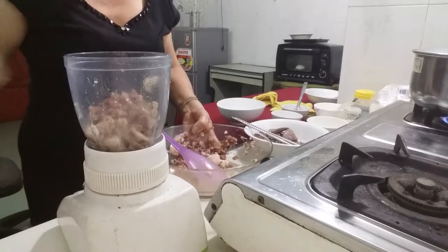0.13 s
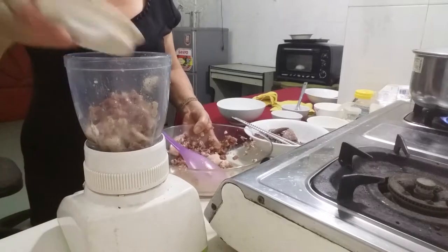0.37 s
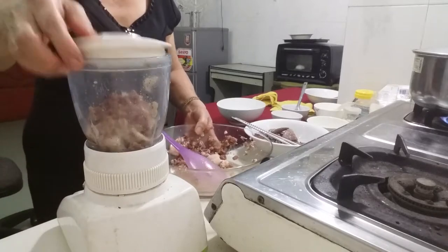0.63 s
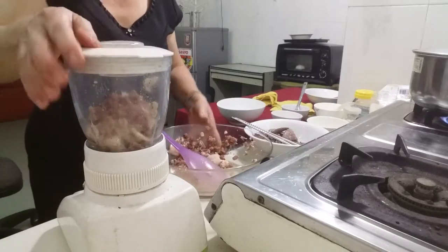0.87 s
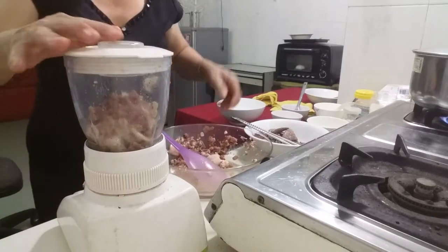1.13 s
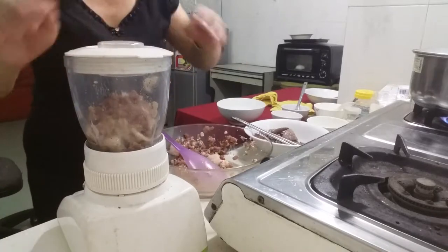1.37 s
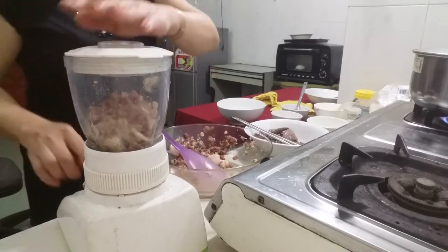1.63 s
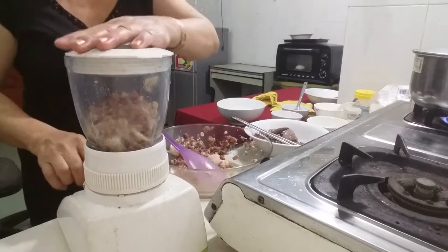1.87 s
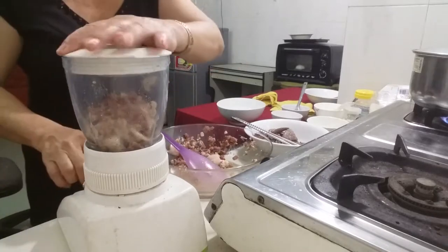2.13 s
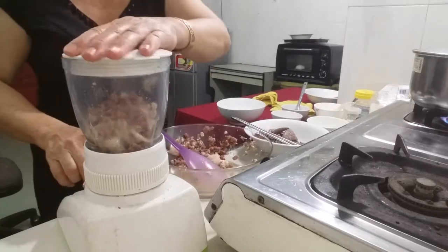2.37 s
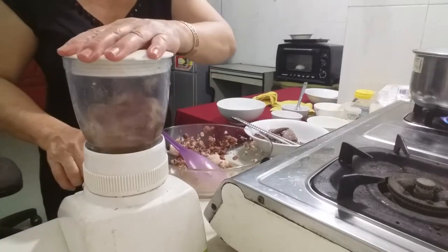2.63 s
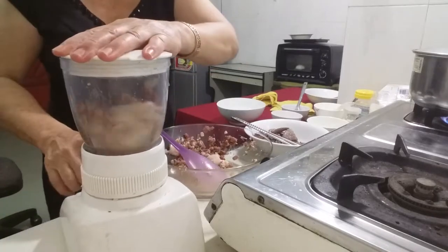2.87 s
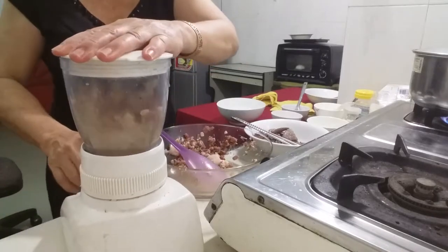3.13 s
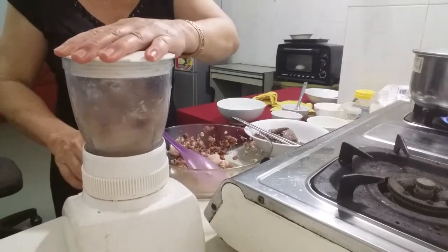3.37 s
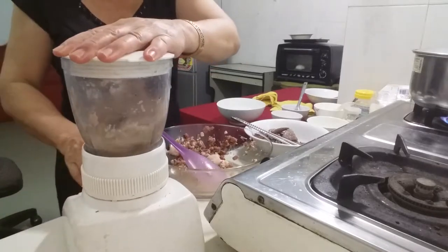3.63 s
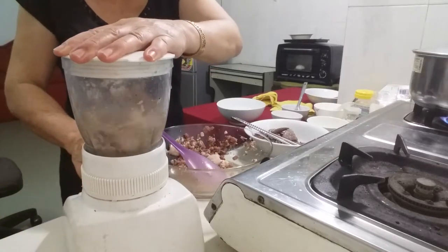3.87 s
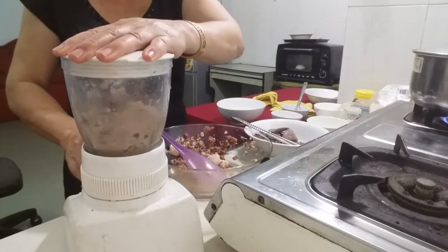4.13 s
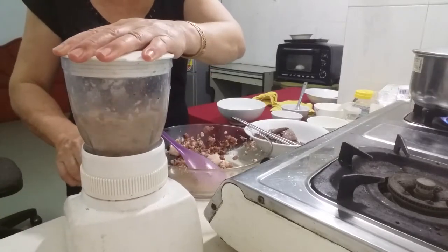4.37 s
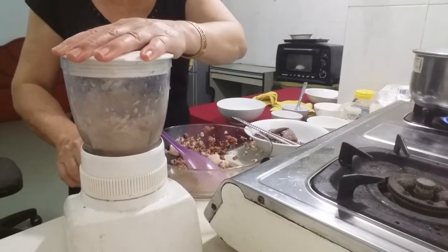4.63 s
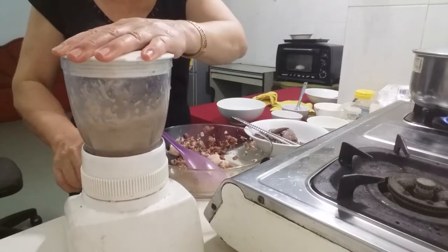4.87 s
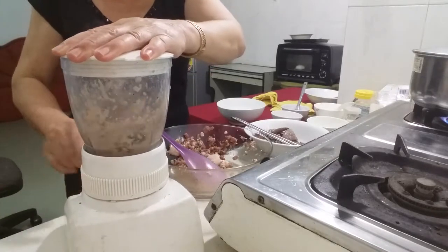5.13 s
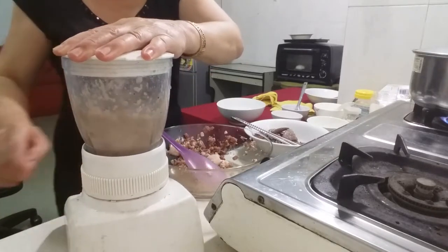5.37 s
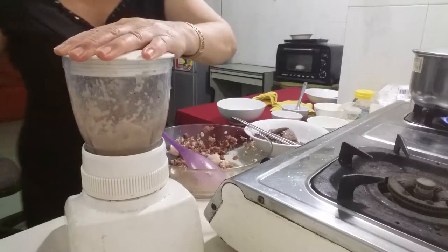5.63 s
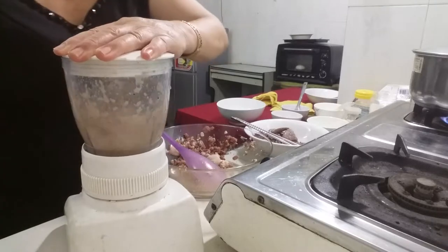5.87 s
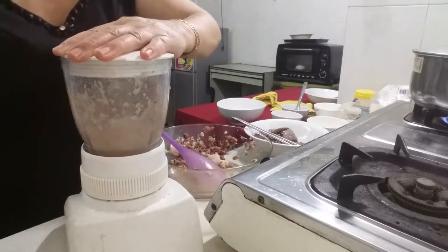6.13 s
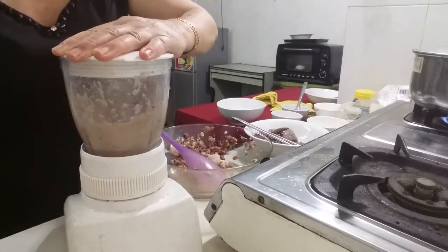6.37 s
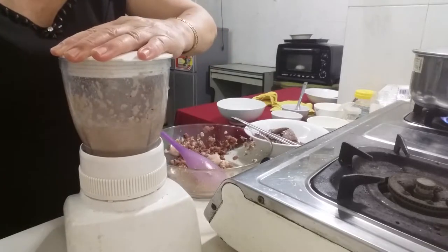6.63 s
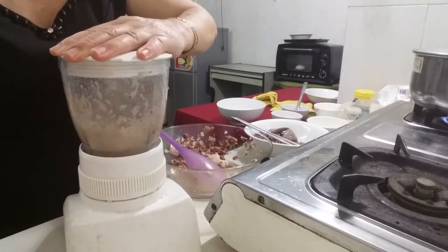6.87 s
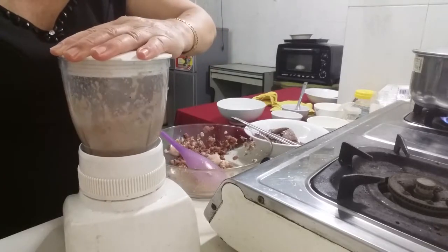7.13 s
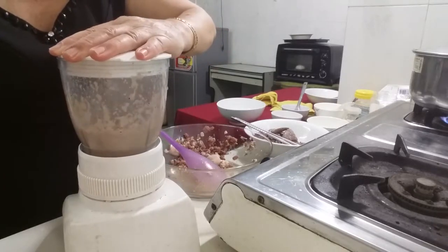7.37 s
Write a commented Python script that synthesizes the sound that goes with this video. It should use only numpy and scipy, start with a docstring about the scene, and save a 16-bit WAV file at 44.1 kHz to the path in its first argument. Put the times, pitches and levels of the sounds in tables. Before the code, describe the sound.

A dish clatters, a plastic lid goes on, a switch clicks, and a blender grinds chunky meat roughly, then faster after a sharp second click.

```python
"""A countertop blender grinds meat in a hard-walled kitchen, slowly, then faster after a second switch click.
Its motor is a sum of shaft harmonics; the meat is shaped noise that throbs once a turn, with cracks and knocks.
Before that a dish clatters, the lid goes on the jar, a hand presses it and a switch clicks: damped modes and noise.
A refrigerator hums in the background as steady tones over shaped air noise."""
import sys
import numpy as np
from scipy import signal
from scipy.fft import rfft, irfft, next_fast_len
from scipy.io import wavfile
from scipy.ndimage import uniform_filter1d, map_coordinates

SR = 44100
rng = np.random.default_rng(int(sys.argv[2]) if len(sys.argv) > 2 else 0)


def master(y):
    """Save y as 16-bit WAV."""
    cut = np.clip(np.atleast_2d(y).T, -1, 1)
    pcm = np.round(cut * 32767)  # scale
    wavfile.write(sys.argv[1], SR, pcm.astype(np.int16))


def to_linear_factor(level_db):
    """Convert decibel levels (scalar or array-like) to linear amplitude factors."""
    exponent = np.asarray(level_db, float) / 20
    return 10 ** exponent


N = 330750
T = np.arange(N) / SR  # time [s]
GEAR_S = 4.87  # the high gear engages
JAM_S = 3.211  # a hard piece jams under the blades

# churning meat: (time [s], roar level [dB], spatter level [dB])
GRIND = [(2.609, -18.5, -37), (2.65, -24, -38.5), (3.1, -22, -33), (3.7, -22.5, -33), (4.5, -23.5, -34),
         (5.33, -16.5, -30), (7.25, -18.5, -30), (7.5, -17.5, -26.5)]
# relative spectrum of the churning roar: (frequency [Hz], density [dB per Hz])
ROAR_SPECTRUM = [(24, -59), (40, -29), (103, -4.5), (193, -8), (264, 2), (377, 4), (506, -12.5), (1300, -2),
                 (1500, -11.5), (2240, -14), (2820, -17), (6000, -32.5), (13200, -120)]
# relative spectrum of the wet spatter: (frequency [Hz], density [dB per Hz])
SPATTER_SPECTRUM = [(1470, -13.5), (2500, -3), (5520, -8.5), (6200, -12), (7250, -11), (12800, -25),
                    (14900, -26), (16000, -31)]
# resonances of the jar: (centre [Hz], width [Hz], boost [dB])
JAR_RESONANCES = [(381.7, 17, 5), (1104, 39, 5), (1322, 10, 6), (1808, 310, 6.5), (2232, 134, 7.5),
                  (5200, 110, 3.5)]
# the clearest lumps of gristle: (time [s], crack level [dB], knock level [dB], shaft speed loss [Hz])
GRISTLE = [(2.786, -27, -13, 3.2), (2.87, -22, -11, 2.9), (3.044, -19.5, -5, 4.2), (3.109, -19, -8.5, 1.9),
           (3.208, -31, -5, 2.4), (3.483, -19, -6.5, 1.86), (3.505, -16, -32, 2.2), (3.553, -23, -10, 2.73),
           (3.671, -32, -4, 1.9), (3.7645, -32, -1.5, 2.05), (3.831, -31, -3.5, 1.64), (3.895, -25, -3, 2),
           (3.9251, -19, -24, 1.45), (4.017, -22, -3.5, 2.77), (4.1212, -18.5, -4, 1.98),
           (4.185, -15, -5, 3.6), (4.287, -15.5, -17, 2.3), (4.364, -22, 2, 1.9), (4.44, -18, -7.5, 2.8),
           (4.48, -20, -6.5, 0.82), (4.7467, -20, -5, 4.8), (4.904, -19.5, -6, 2.5),
           (5.069, -18, -4.5, 2.4), (5.137, -20, -6, 17.7), (5.2937, -21.5, -4, 3.44),
           (5.311, -16, -2, 1.33), (5.393, -16.5, -26, 7.4), (5.446, -14.5, -11, 1.8),
           (5.508, -20, -1, 4.2), (5.6014, -30, -1, 2.1), (5.6814, -17.5, -6, 1.56),
           (5.8288, -14, -5, 15.3), (5.946, -12.5, 0, 23), (6.022, -18, -19, 1.53), (6.229, -13, -4, 3.7),
           (6.382, -24, -5, 7.5), (6.514, -15.5, 3, 9.3), (6.62, -23, -0.5, 6.6), (6.7209, -22, -4, 6.3),
           (6.901, -18, -1.5, 1.6), (7.045, -17.5, -1, 19.6), (7.2191, -21, -2.5, 1.9), (7.475, -11, -7, 4)]
# blade blows on the jammed piece: (time [s], crack level [dB])
JAM_BLOWS = [(3.206, -35), (3.216, -19), (3.233, -12), (3.252, -15), (3.274, -20), (3.289, -13.5),
             (3.309, -10.5), (3.331, -11), (3.349, -14)]


def unit(x):
    """Normalisation of the mean power: scaled to rms 1."""
    return x / np.sqrt(np.mean(x ** 2) + 1e-20)


def along(points, hz):
    """Interpolation of (frequency [Hz], value) points on a logarithmic frequency axis."""
    f, v = np.transpose(points)
    return np.interp(np.log(hz + 1), np.log(f + 1), v)


def curves(rows):
    """Linear interpolation in time of each column, then a gate open only while the table lasts."""
    s, *columns = np.transpose(rows)
    lasts = 1. * ((T > s[0]) & (T <= s[-1]))
    gate = uniform_filter1d(lasts, size=300)
    return [np.interp(T, s, column) for column in columns] + [gate]


def wobble(rate):
    """Band-limited random modulation: a smooth curve through rate random knots a second."""
    knots = rng.standard_normal(int(N * rate / SR) + 4)
    return map_coordinates(knots, [T * rate])


def filtered(x, response):
    """Linear filtering: the spectrum of x times a response of frequency."""
    m = next_fast_len(N + 8192)
    return irfft(rfft(x, m) * response(np.fft.rfftfreq(m, 1 / SR)), m)[:N]


def coloured(x, spectrum, modes=()):
    """Source-filter principle: x through a spectrum with resonant bumps, then rms 1."""
    def response(f):
        bumps_db = sum(db / (1 + (2 * (f - centre) / width) ** 2) for centre, width, db in modes)
        return to_linear_factor(along(spectrum, f) + bumps_db)
    return unit(filtered(x, response))


def band(x, lo_hz, hi_hz):
    """Band limitation: a steep causal band-pass that keeps the level of white noise."""
    sos = signal.butter(3, [lo_hz, min(hi_hz, SR * .49)], "band", fs=SR, output="sos")
    return signal.sosfilt(sos, x) * np.sqrt(SR / 2 / (hi_hz - lo_hz))


def swells(times, levels_db, t60, rise=0.00064):
    """Superposition of envelopes that rise and decay exponentially from each time (t60, rise in s)."""
    strikes = np.zeros(N)
    strikes[np.round(np.asarray(times) * SR).astype(int)] = to_linear_factor(levels_db)
    t = T[:SR // 4]
    envelope = to_linear_factor(-60 * t / t60) * (1 - np.exp(-t / rise))
    return signal.fftconvolve(strikes, envelope)[:N]


def bursts(times, levels_db, t60):
    """Impact excitation: a sharp first contact followed by noise that decays exponentially."""
    first = swells(times, levels_db - 2.0, t60=0.0002, rise=.00002)
    return first + swells(times, levels_db, t60) * rng.standard_normal(N)


def ring(hz, db, t60, attack=0.00087):
    """Free vibration of one damped mode: a decaying sine with a soft onset."""
    t = T[:SR // 2]
    return to_linear_factor(db - 60 * t / t60) * np.sin(2 * np.pi * hz * t) * (1 - np.exp(-t / attack))


def struck(events, modes, rattle_t60, rattle_hz, tick_t60, tick_hz, treble_db):
    """Modal superposition: each contact rings the modes at new strengths, rattles and ticks."""
    rings = np.zeros(N + SR)
    for s, db, tick_db, _ in events:
        for hz, mode_db, t60 in modes:
            # a sharp contact also reaches the modes in the tick band
            strength_db = db + mode_db + tick_db * (hz > 1650) + rng.normal(0, 1.9)
            rings[round(s * SR):][:SR // 2] += ring(hz, strength_db, t60, attack=0.00057)
    s, db, tick_db, rattle_db = np.transpose(events)
    rattle = band(bursts(s, db + rattle_db, rattle_t60), rattle_hz, 1300)
    ticks = band(bursts(s, db + tick_db, tick_t60), 1070, tick_hz)
    treble = band(bursts(s, db + tick_db, tick_t60), tick_hz, 10600)
    return rings[:N] + rattle + ticks + to_linear_factor(treble_db) * treble


def background():
    """Stationary tones and noise: unsteady refrigerator hum, room air and a clatter that decays exponentially."""
    # refrigerator tones: (frequency [Hz], rms level before a slight wobble [dB])
    hum_tones = [(208.7, -51.5), (103, -58), (305, -60), (604, -66.5)]
    # relative spectrum of the room air: (frequency [Hz], density [dB per Hz])
    air_spectrum = [(18, -62), (30, -20), (75, -15.5), (93, -9.5), (200, -12.5), (273, -16), (311, -17),
                    (473, -27), (620, -29), (1430, -30), (5900, -50), (8200, -52), (8900, -44.5),
                    (9600, -50), (16000, -51)]
    # an earlier clatter dying away: (level at the start [dB], t60 [s])
    earlier_clatter = (-42.5, 0.53)
    hum = sum(to_linear_factor(db + 0.45 * wobble(16.0)) * np.sqrt(2) * np.sin(2 * np.pi * hz * T) for hz, db in hum_tones)
    start_db, t60 = earlier_clatter
    fading = to_linear_factor(start_db - 60 * T / t60) * band(rng.standard_normal(N), 300, 2900)
    air_db = -48.5 + 0.6 * wobble(6.5)
    return hum + fading + to_linear_factor(air_db) * coloured(rng.standard_normal(N), air_spectrum)


def dish_clatter():
    """Modal ringing under impact, with a short soft scrape of the dish amid the contacts."""
    # contacts: (time [s], ring level [dB], tick over ring [dB], rattle over ring [dB])
    contacts = [(.115, -27.5, -36, -3.5), (.135, -30.5, -30, 3.5), (.204, -26, -4, 6), (.216, -27, -7, 4.5)]
    # modes of the dish: (frequency [Hz], relative level [dB], t60 [s])
    dish_modes = [(139, -8, 0.36), (438, 6, 0.043), (545, 4, 0.17), (668, 1, .08), (843, 2, 0.11),
                  (1270, -5.5, 0.16), (2417, -7, .1), (3206, -4, 0.18)]
    # the scrape: (time [s], level [dB], t60 [s], rise [s])
    scrape = (.126, -28, .1, .012)
    clatter = struck(contacts, dish_modes, rattle_t60=0.15, rattle_hz=316, tick_t60=0.092, tick_hz=3850, treble_db=-34)
    s, *shape = scrape
    return clatter + band(swells([s], *shape) * rng.standard_normal(N), 2000, 3300)


def kitchen(x):
    """Reverberation: a diffuse noise tail in which each frequency decays at its own rate."""
    # reverberation of the room: (frequency [Hz], t60 [s])
    decay_times = [(200, 0.49), (1000, 0.64), (4000, 0.55), (12000, 0.48)]
    hz, t, z = signal.stft(rng.standard_normal(SR * 3 // 4), SR, nperseg=256)
    decay = to_linear_factor(-60 * t / along(decay_times, hz)[:, None])
    tail = signal.istft(z * decay, SR, nperseg=256)[1]
    delayed = np.pad(x, (250, 0))  # the tail starts 250 samples late
    return signal.fftconvolve(delayed, tail / np.linalg.norm(tail))[:N]


def switch():
    """Impulsive excitation of plastic modes: a short snap and dry tick of lid rim or switch, and a housing thump."""
    # snaps: (time [s], snap level [dB], snap frequency [Hz], thump over snap [dB])
    snaps = [(0.49, -17.5, 2410, -15), (0.528, -18.5, 2400, -13), (2.576, -21.5, 2650, -7.5),
             (2.609, -5, 2670, -5.5), (2.616, -7, 2540, -6), (4.838, 9.5, 2640, -20)]
    out = np.zeros(N + SR)
    for s, db, hz, thump_db in snaps:
        snap = ring(hz, db, 0.011, attack=0.0019) + ring(1.4 * hz, db - 16, 0.015, attack=0.0022)
        thump = ring(403, db + thump_db, 0.041) + ring(960, db + thump_db - 3, 0.019)
        out[round(s * SR):][:SR // 2] += snap + thump
    s, db, _, thump_db = np.transpose(snaps)
    tick = band(bursts(s, db + thump_db - 29, 0.067), 1400, 4800)
    return out[:N] + tick


def lid_contacts():
    """Modal ringing under impact: the lid goes on the jar and a hand presses it."""
    # contacts: (time [s], ring level [dB], tick over ring [dB], rattle over ring [dB])
    contacts = [(.528, -38.5, -5.5, 1), (.688, -36, -5, 2), (.726, -39.5, 2, 6), (.742, -40, 5, 8),
                (.762, -16.5, -6.5, -5.5), (.912, -44, -17, 8), (1.947, -41.5, -21, -5),
                (2.004, -46, -1.5, 1), (2.127, -64, 13.5, -8)]
    # modes of the lid: (frequency [Hz], relative level [dB], t60 [s])
    lid_modes = [(362, 6.5, 0.09), (540, -6.5, 0.043), (1290, -10, 0.037), (2050, 7.5, 0.033),
                 (3270, -1, .02), (4800, -1, 0.013)]
    return struck(contacts, lid_modes, rattle_t60=0.099, rattle_hz=402, tick_t60=0.098, tick_hz=4440, treble_db=-22)


def blender():
    """Superposition of shaft harmonics, amplitude-modulated churning noise and the noises of the jam."""
    tones, turn = motor(unsteady_low=0.3, unsteady_high=0.08)
    spray = swells(*np.transpose(JAM_BLOWS), t60=0.11, rise=0.0059)  # each blow throws its own spray
    return tones + jam_hum() + jam_fizz(spray) + churning(turn, spray)


def churning(turn, spray):
    """Amplitude modulation of noise: roar and spatter follow the tumbling lumps and throb once a turn."""
    paste_smooths = 0.23  # share of the low rumble that goes in high gear
    jam_spatter_db = -11
    roar_db, spatter_db, on = curves(GRIND)
    lumps = wobble(22)  # lumps tumble through the blades
    throb = 1 + 0.067 * turn
    surge = to_linear_factor(0.83 * lumps + 1.17 * wobble(70))
    roar = coloured(throb * surge * rng.standard_normal(N), ROAR_SPECTRUM, JAR_RESONANCES)
    roar = roar - paste_smooths * (T > GEAR_S) * filtered(roar, lambda hz: hz < 480)
    drops = to_linear_factor(2.1 * lumps + 1.2 * wobble(170) + 1.8 * wobble(900))  # spatter is grainy
    spatter = coloured(throb * drops * rng.standard_normal(N), SPATTER_SPECTRUM, JAR_RESONANCES)
    spatter_gain = to_linear_factor(spatter_db) + to_linear_factor(jam_spatter_db) * spray
    return on * (to_linear_factor(roar_db) * roar + spatter_gain * spatter)


def motor(unsteady_low, unsteady_high):
    """Forced vibration: an unbalanced load shakes the housing at shaft multiples; also gives the turn.

    The unsteady settings are phase wobble [rad] in low and high gear."""
    # the loaded motor, low gear then high gear: (time [s], shaft speed before braking [Hz], shake [dB])
    shaft = [(2.62, 73.3, -6.5), (3.29, 72.97, -6.5), (3.41, 69.7, -5), (3.68, 89, -0.5), (3.9, 88, -1),
             (4.1, 88.8, 0), (4.45, 88.96, 2), (4.6, 86.1, 0), (4.7, 88.3, -2.5), (4.84, 85.6, -8),
             (4.88, 108.7, 2.5), (4.93, 114.7, 2), (5.05, 134.9, -5), (5.22, 141.1, -2), (5.75, 145.9, 0),
             (6.05, 148.2, -1.5), (6.15, 139, 1), (6.25, 133.3, -6.5), (6.46, 139.8, -2),
             (6.75, 142.6, -2.5), (7.02, 147.8, -1), (7.18, 151.6, 1.5), (7.28, 138.4, 0),
             (7.42, 149.1, -1), (7.5, 139, -0.5)]
    # shaft orders: (multiple, low gear level [dB], high gear level [dB],
    # growth in high gear as the meat turns to paste [dB per s])
    shaft_orders = [(1, -4.5, -0.5, -1.4), (2, -16, 4.5, -2), (3, -11.5, 3.5, 0.18), (4, -12.5, -10.5, 2.5),
                    (5, -24, -4, 2.5)]
    # how strongly the housing radiates each tone: (frequency [Hz], relative level [dB])
    housing = [(70, -28.5), (90, -33.5), (132, -29), (147, -22), (215, -21.5), (262, -21), (280, -20.5),
               (296, -16), (350, -12.5), (400, -18.5), (445, -33.5), (530, -42), (590, -26.5), (660, -47),
               (750, -28)]
    brake_lag_s, brake_s = 0.028, .024  # a lump slows the shaft just after the blade meets it
    brake_damps_db_per_hz = 0.17  # and damps the shaking
    hz, shake_db, gate = curves(shaft)
    brake_hz = sum(loss_hz * np.exp(-((T - s - brake_lag_s) / brake_s) ** 2) for s, _, _, loss_hz in GRISTLE)
    hz = hz - brake_hz
    shake_db = shake_db - brake_damps_db_per_hz * brake_hz
    high = np.clip((T - GEAR_S) / 0.071, 0, 1)  # 0 in low gear, 1 in high gear
    unsteady = unsteady_low + (unsteady_high - unsteady_low) * high
    angle = 2 * np.pi * np.cumsum(hz) / SR + unsteady * wobble(40)
    tones = np.zeros(N)
    for multiple, low_db, high_db, growth in shaft_orders:
        gear_db = low_db + high * (high_db - low_db + growth * (T - GEAR_S))
        flutter_db = (2.5 - 0.87 * high) * wobble(18)
        level = to_linear_factor(along(housing, multiple * hz) + gear_db + flutter_db)
        tones += level * np.sin(multiple * angle + rng.uniform(0, 2 * np.pi))
    return np.sqrt(2) * gate * to_linear_factor(shake_db) * tones, gate * np.cos(angle)


def chops():
    """Impact of blade on gristle: a bright crack and a modal clack of the jar inside a slower knock."""
    # jar and blade struck by a lump: (frequency [Hz], relative level [dB], t60 [s])
    clack_modes = [(1100, -15, 0.022), (1930, -12, 0.019), (2300, -25, 0.0097), (2975, -26, 0.018),
                   (4080, 0, 0.0085), (5640, -4, 0.016), (7000, -10, 0.012)]
    # edges of the jar's zones: (frequency [Hz])
    zone_edges = [500, 1000, 1230, 1500, 2000, 2600, 6000]
    scraps_per_s, scrap_crack_db, scrap_knock_db, scrap_spread_db = 22, -24, -10, 9.5  # dB: strongest scraps
    jam_knock_db, jam_frees_db_per_s = -41, 43  # knocks fade as the piece breaks up
    clack_db, clack_spread_db = -7.5, 9.5  # over the crack; each blow favours other modes
    zone_spread_db = 3  # each wet knock favours other zones

    # smaller scraps at random moments
    start, end = GRIND[0][0], GRIND[-1][0]
    draw = rng.standard_normal((200, 3))
    when = start + np.cumsum(np.abs(draw[:, 0]) + .5) / 1.3 / scraps_per_s
    weaker_db = scrap_spread_db * np.abs(draw[:, 1:])
    scraps = np.c_[when, scrap_crack_db - weaker_db[:, 0], scrap_knock_db - weaker_db[:, 1]]
    scraps = scraps[when < end - .01]
    rattle = [(s, db, jam_knock_db - jam_frees_db_per_s * (s - JAM_S)) for s, db in JAM_BLOWS]
    s, crack_db, knock_db = np.vstack([scraps, rattle, np.array(GRISTLE)[:, :3]]).T

    dulled_jar = JAR_RESONANCES + [(13000, 7600, -7)]
    bright = coloured(rng.standard_normal(N), SPATTER_SPECTRUM, dulled_jar)
    crack = swells(s - .001, crack_db, t60=0.039, rise=0.0012) * bright

    churn = unit(band(coloured(rng.standard_normal(N), ROAR_SPECTRUM, JAR_RESONANCES), 610, 5200))
    favours = zone_spread_db * rng.standard_normal((len(s), len(zone_edges) - 1))
    knock = np.zeros(N)
    for lo, hi, db in zip(zone_edges, zone_edges[1:], favours.T):
        zone = filtered(churn, lambda hz: (hz > lo) & (hz <= hi))
        knock += swells(s - .011, knock_db + db, t60=0.075, rise=0.024) * zone

    clack = np.zeros(N)
    for hz, db, t60 in clack_modes:
        blows = np.zeros(N)
        favour_db = clack_spread_db * np.clip(rng.standard_normal(len(s)), -2, 1.5)
        blows[np.round(s * SR).astype(int)] = to_linear_factor(crack_db + clack_db + favour_db)
        clack += signal.fftconvolve(blows, ring(hz, db, t60, attack=0.00066)[:SR // 10])[:N]
    return crack + knock + clack


def jam_hum():
    """Magnetic force goes as the square of the current: the strained motor hums at twice the mains."""
    jam_long_s, hum_spread_s, hum_db = .155, 0.18, -29  # level: rms at the height of the strain
    strain = np.exp(-((T - JAM_S - jam_long_s / 2) / hum_spread_s) ** 2)
    return np.sqrt(2) * strain * to_linear_factor(hum_db) * np.sin(2 * np.pi * 100 * T)


def jam_fizz(spray):
    """Modulated high-band noise: the root of the spray envelope decays slower, so fizz outlasts spray."""
    grains = to_linear_factor(2.7 * wobble(780)) * rng.standard_normal(N)
    return np.sqrt(np.abs(spray)) * to_linear_factor(-33) * unit(band(grains, 7600, 16000))


def scene():
    """Superposition of direct sound and reverberation: contacts with room tail, blender and background."""
    lid, dish = lid_contacts(), dish_clatter()
    hits, key = chops(), switch()
    wet = to_linear_factor(-6) * kitchen(lid) + to_linear_factor(-5) * kitchen(dish)
    wet += to_linear_factor(-5.5) * kitchen(hits) + to_linear_factor(-8) * kitchen(key)
    return (lid + dish + hits + key + wet + blender() + background())[None]


def top_cut(x):
    """Nothing passes above the cut-off."""
    return signal.sosfilt(signal.butter(12, 16360, fs=SR, output="sos"), x)


def record(dry):
    """Band limitation: a phone microphone drops the deepest bass; the treble ends at a sharp edge."""
    sos = signal.butter(2, 45, "high", fs=SR, output="sos")
    picked_up = signal.sosfilt(sos, dry[0])
    heard = filtered(picked_up, lambda hz: hz < 15850)
    return top_cut(heard[None])


dry = scene()
out = record(dry)
master(out)
```